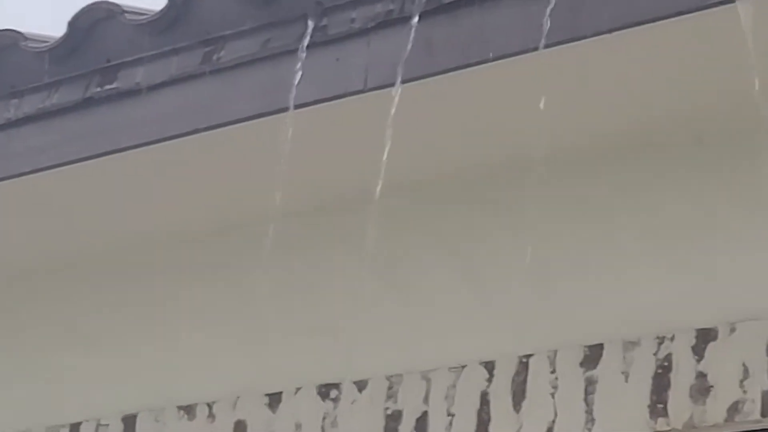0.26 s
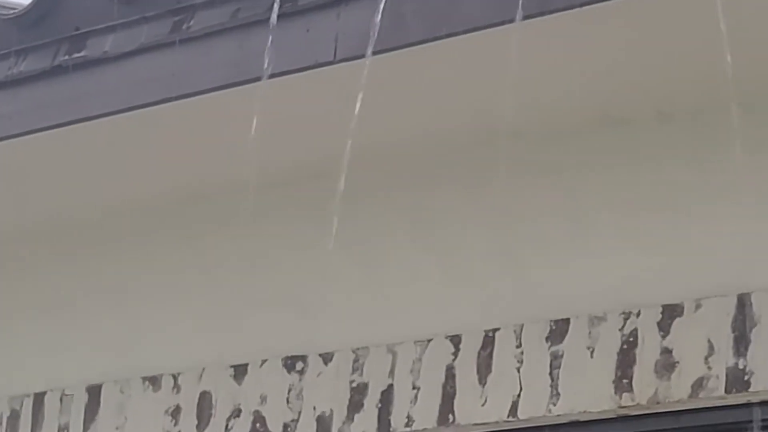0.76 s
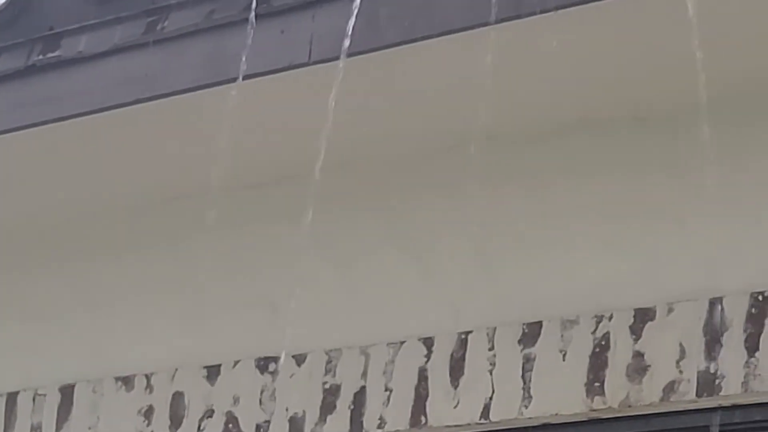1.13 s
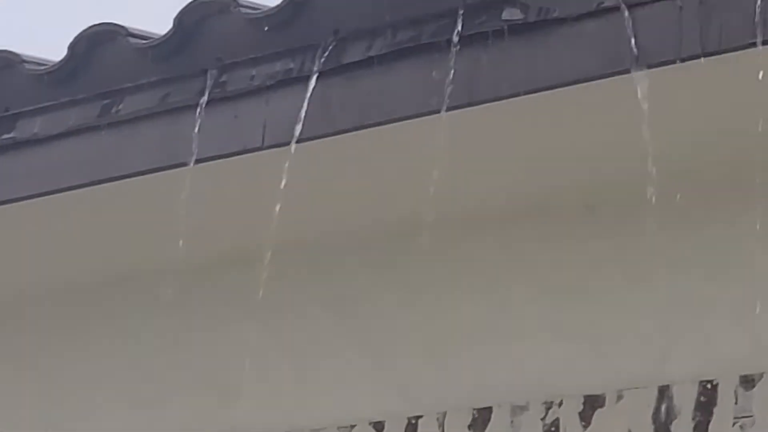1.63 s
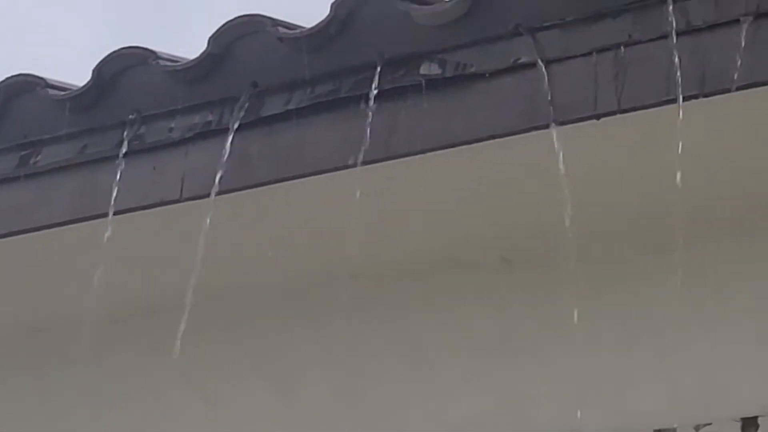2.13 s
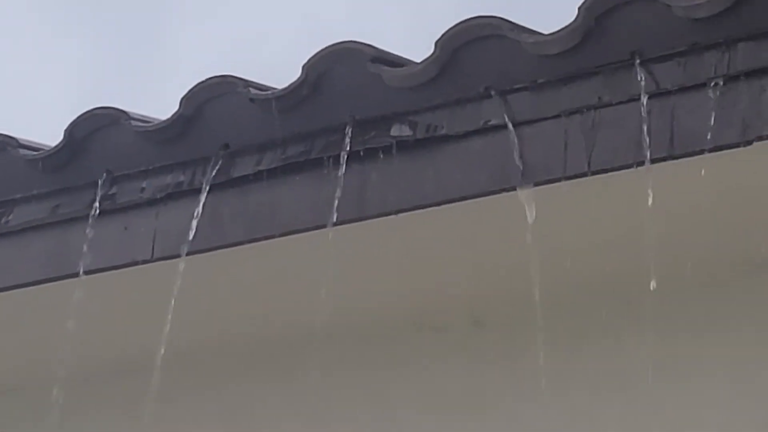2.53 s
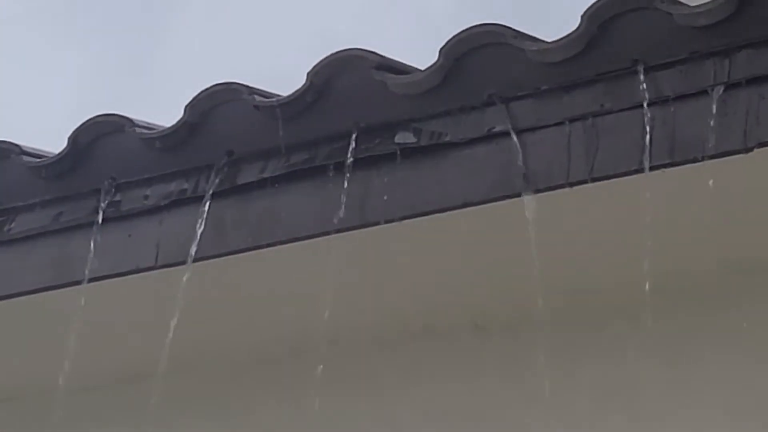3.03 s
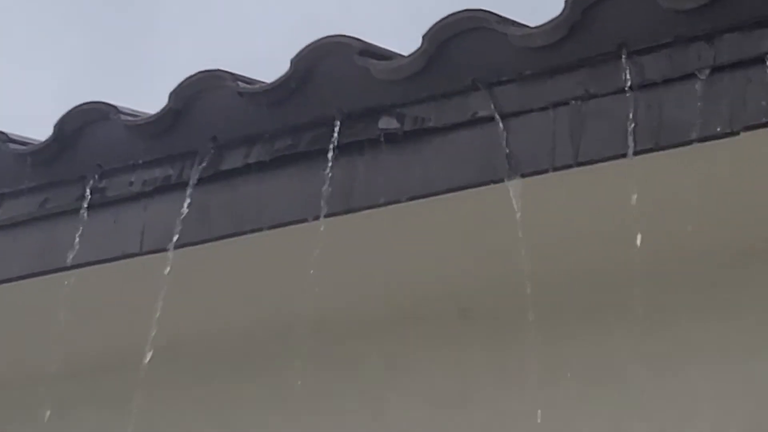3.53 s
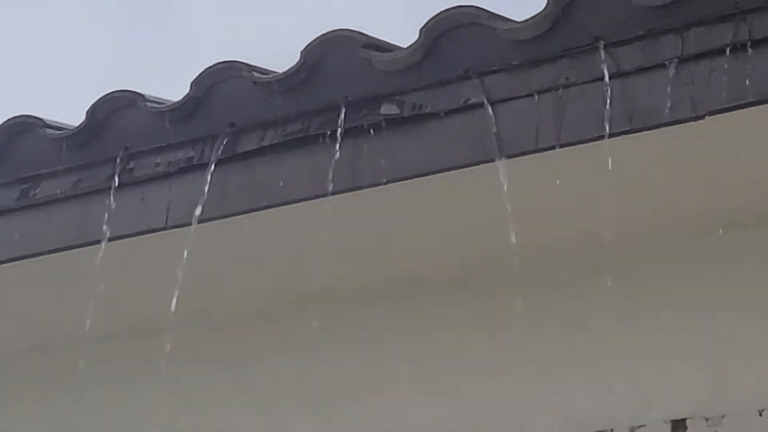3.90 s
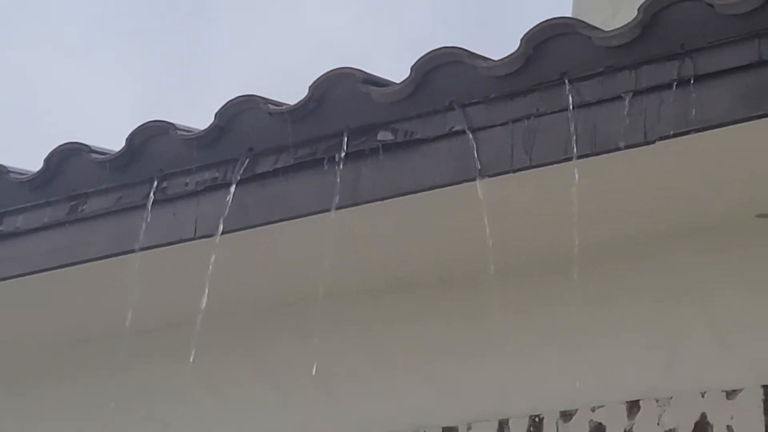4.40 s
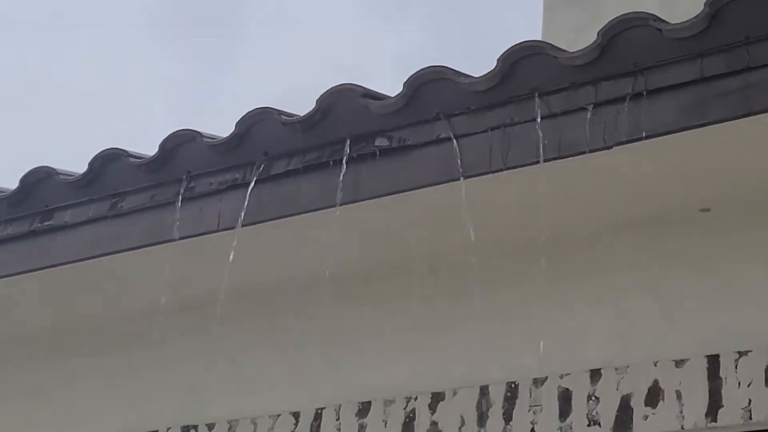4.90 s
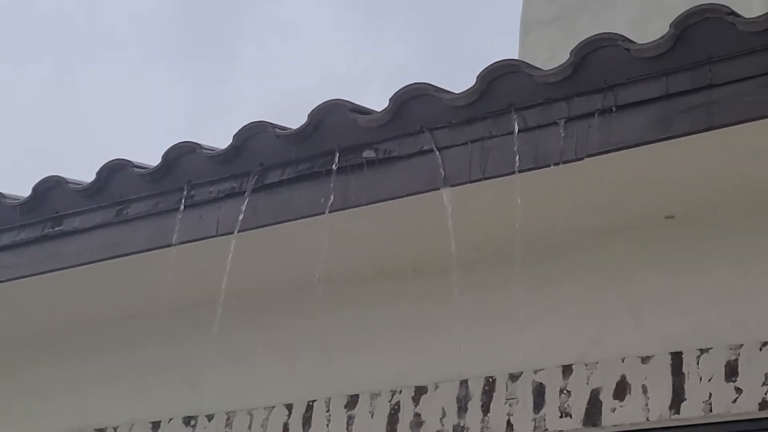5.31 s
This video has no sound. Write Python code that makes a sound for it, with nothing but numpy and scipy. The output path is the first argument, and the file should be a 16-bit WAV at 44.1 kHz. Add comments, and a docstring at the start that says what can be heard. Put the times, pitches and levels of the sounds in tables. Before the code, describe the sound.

Steady rain runs off a tile roof in thin streams, splattering crisply and continuously on wet paving beside a house.

```python
"""Steady rain beside a house: streams pour off a tile roof and splat on wet paving throughout.
Each splat is a short rising plop plus a noise burst, thrown back by walls 4-27 ms later and by a diffuse yard.
Filtered noise makes the far rain and town rumble; a wavering sine hums. Decaying sines ping on the downpipe
near 0.1, 0.7, 1.1, 2.6 and 4.6 s; low sine thuds fall from 0.13 to 4.6 s.
The patter's spray swings right, then left by 0.9 s, and right again after 4.3 s as the treble colour shifts."""
import sys
import numpy as np
from scipy import signal
from scipy.fft import rfft, irfft, next_fast_len
from scipy.io import wavfile
from scipy.ndimage import uniform_filter1d, map_coordinates

SR = 44100
rng = np.random.default_rng(int(sys.argv[2]) if len(sys.argv) > 2 else 0)


def materialize(psi):
    """Save the field psi as 16-bit PCM at rate SR to the path in sys.argv[1].

    A 1-D psi becomes a single channel; in a 2-D psi each row is a channel.
    """
    bounded = np.clip(np.atleast_2d(psi).T, -1, 1)
    quanta = np.round(bounded * 32767).astype(np.int16)
    wavfile.write(sys.argv[1], SR, quanta)


N = 244744

# how hard the streams run: (time [s], plop level [dB], spray level [dB])
FLOW = [(0.0, -20.5, -21), (0.17, -22, -28.5), (0.34, -22, -21), (0.97, -21.5, -25), (1.07, -18.5, -31),
        (1.28, -20, -26.5), (1.39, -28, -20), (1.41, -18.5, -21), (1.61, -22, -22.5), (1.82, -23, -32.5),
        (1.84, -21, -30.5), (2.27, -22, -19.5), (2.47, -20.5, -22.5), (2.49, -22.5, -22.5),
        (2.98, -18.5, -23), (3.06, -23, -27), (3.14, -24, -23), (3.71, -21, -23), (4.39, -22, -28),
        (4.44, -27.5, -20), (4.48, -21.5, -24), (5.43, -25, -21.5), (5.52, -20.5, -24), (5.55, -25, -26)]
# spray drifts across, port colour shifts: (time [s], left over right [dB], share of shifted colour [0-1])
TURN = [(0, 3, 0), (.4, -2, 0.06), (.9, 3, 0), (4.3, 3.5, 0.2), (4.9, -2, 0.45), (5.55, -5.5, 0.6)]


def amp(db):
    """dB to gain."""
    return 10 ** (np.asarray(db) / 20)


def unit(x):
    """Scale to rms 1."""
    return x / np.sqrt(np.mean(x ** 2) + 1e-20)


def along(points, hz, axis=1):
    """One column of (Hz, value, ..) points, read on a log frequency axis."""
    p = np.array(points, float)
    return np.interp(np.log(hz + 1), np.log(p[:, 0] + 1), p[:, axis])


def curves(rows):
    """One value per sample for each column after the time."""
    time_s, *columns = np.transpose(rows)
    return [np.interp(np.arange(N) / SR, time_s, column) for column in columns]


def wobble(rate_hz):
    """A smooth random curve with rate_hz knots a second."""
    knots = rng.standard_normal(N // 100)
    return map_coordinates(knots, [np.arange(N) * rate_hz / SR])


def filtered(x, response):
    """x times a response of frequency."""
    m = next_fast_len(N + 8192)
    return irfft(rfft(x, m) * response(np.fft.rfftfreq(m, 1 / SR)), m)[..., :N]


def rush(spectrum, patchy_db):
    """Stereo noise of rms 1 with time-frequency patches of random gain; likeness sets the mid/side split."""
    # left-right likeness: (frequency [Hz], correlation [0-1])
    likeness = [(60, 0.95), (130, 1), (290, 0.92), (640, 0.68), (1410, 0.3), (3100, 0.13), (6820, 0.27),
                (15000, 0.19)]
    z = signal.stft(rng.standard_normal((2, N)), nperseg=256)[2]
    field = uniform_filter1d(rng.standard_normal(z.shape[1:]), size=5, axis=0)
    field = uniform_filter1d(field, size=8, axis=1)
    pair = signal.istft(z * amp(patchy_db * unit(field)), nperseg=256)[1][:, :N]

    def response(hz):
        angle = np.arccos(np.clip(along(likeness, hz), -1, 1)) / 2
        return amp(along(spectrum, hz)) * [np.cos(angle), np.sin(angle)]

    mid, side = filtered(pair, response)
    return unit(np.array([mid + side, mid - side]))


def lay(start_s, shapes):
    """Sum rows of samples into one track, each from its start time."""
    at = np.round(start_s * SR).astype(int)[:, None] + np.arange(shapes.shape[1])
    return np.bincount(np.clip(at, 0, N).ravel(), shapes.ravel(), N + 1)[:N]


def swell(t, rise_s):
    """An envelope that peaks at 1 after rise_s, then decays smoothly."""
    u = t / rise_s
    return (u * np.exp(1 - u)) ** 2


def town():
    """Low rumble, nearly the same at both ports, with a hum unsteady in level and pitch."""
    # rumble spectrum: (frequency [Hz], relative density [dB])
    rumble_spectrum = [(14, -38), (24, -6), (80, 0.5), (94, -6), (123, -10.5), (195, -8.5), (316, -14.5),
                       (435, -13), (537, -17.5), (665, -17), (822, -14), (900, -18), (1170, -53),
                       (1980, -120)]
    # how the hum wavers: (time [s], level [dB])
    hum_level = [(0.0, -55), (0.12, -39), (0.29, -58), (0.48, -39), (1.11, -48), (2.83, -43), (3.01, -58),
                 (3.06, -37), (3.21, -54), (3.29, -40), (4.39, -54.5), (4.44, -37), (4.51, -56),
                 (4.56, -39), (5.47, -44.5), (5.55, -56)]
    hum_hz, drift_hz, flutter_db = 85, 3.19, 2
    rumble_db, rumble_swell_db = -38.5, 1.24
    hum_db = curves(hum_level)[0] + flutter_db * wobble(10)
    cycles = np.cumsum(hum_hz + drift_hz * wobble(8.7)) / SR
    hum = np.sqrt(2) * amp(hum_db) * np.sin(2 * np.pi * cycles)
    rumble = amp(rumble_db + rumble_swell_db * wobble(6)) * rush(rumble_spectrum, patchy_db=1.5)
    return rumble + hum * amp([[-.6], [.6]])


def rain():
    """Countless far drops merge into a hiss that swells a little with the flow."""
    # hiss spectrum: (frequency [Hz], relative density [dB])
    hiss_spectrum = [(500, -56), (800, -13), (1100, -10.5), (1400, -2), (1700, 0.5), (2000, -3), (2400, -4),
                     (2900, 7), (3500, -2.5), (6000, 0.5), (16000, -6)]
    plop_db = curves(FLOW)[0]
    level_db = -23.0 + 0.8 * (plop_db - plop_db.mean())
    return amp(level_db) * rush(hiss_spectrum, patchy_db=1.0)


def pings():
    """Drops strike the downpipe, which rings faintly on one decaying note."""
    # strikes: (time [s], level before the 0.8 ms onset [dB])
    strikes = [(.08, -43), (.135, -44), (.745, -44), (1.128, -42), (1.16, -44), (2.53, -40), (2.565, -43),
               (2.6, -42), (2.626, -42), (4.62, -43)]
    # pipe note: (pitch [Hz], t60 [s])
    pipe = (840, .16)
    s, db = np.transpose(strikes)[:, :, None]
    hz, t60_s = pipe
    t = np.arange(SR // 4) / SR
    envelope = amp(db - 60 * t / t60_s) * (1 - np.exp(-t / 0.0008))
    return lay(s[:, 0], envelope * np.sin(2 * np.pi * hz * t))


def thuds():
    """Heavy lumps of water hit the ground: each is a soft low push of a few cycles."""
    # lumps: (start time [s], envelope peak [dB], pitch [Hz])
    lumps = [(0.133, -39, 203), (0.549, -33, 181), (1.719, -33, 258), (1.992, -36, 194), (2.233, -35, 213),
             (2.352, -33, 253), (3.207, -29, 198), (3.27, -35, 243), (3.983, -43, 135), (4.263, -32, 241),
             (4.626, -42, 179.2)]
    s, db, hz = np.transpose(lumps)[:, :, None]
    t = np.arange(2000) / SR
    return lay(s[:, 0], amp(db) * swell(t, 1.47 / hz) * np.sin(2 * np.pi * hz * t))


def splats(rows, cycles, glide, spray_s, lag_s):
    """Plops (shrinking air pockets) and spray (noise bursts), direct and off each wall, spread in time."""
    # reflectors: (delay [s], random spread [s], level [dB], lag of left behind right [s])
    walls = [(.0039, .0003, -4, .00003), (.0053, .0004, -8, -.00007), (.016, .001, -13, .0001),
             (.021, .001, -13, -.0001), (.027, .001, -15, .0001)]
    # thin water radiates no bass, the paving lifts two bands: (frequency [Hz], gain [dB])
    puddle = [(300, -49), (700, -8.5), (1000, -8), (1400, 0), (1700, -4), (2000, 1), (2400, -1),
              (2900, 1.6), (3500, -1), (16000, 2)]
    # spray colour: (frequency [Hz], gain [dB])
    spray_colour = [(1000, -28.5), (3000, -22), (5000, -14), (7000, -9), (16000, -9)]
    s, plop_db, hz, spray_db, pan_db = np.transpose(rows)
    t = np.arange(150) / SR
    chance = rng.standard_normal((len(s), 5 + len(walls)))

    rise_s = (cycles * np.exp(.25 * chance[:, 0]) / hz)[:, None]
    # the air pocket shrinks: pitch climbs, passing hz at the envelope peak
    turns = hz[:, None] * (t + glide * (t * t / (2 * rise_s) - t)) + chance[:, 1:2]
    plop = amp(plop_db)[:, None] * swell(t, rise_s) * np.sin(2 * np.pi * turns)

    burst_s = spray_s * np.exp(.4 * chance[:, 2:3])
    fizz = rng.standard_normal(plop.shape)
    # finer droplets fizz higher: each burst has its own tilt
    bright = np.tanh(0.6 * chance[:, -1])[:, None]
    fizz = (fizz - bright * np.roll(fizz, 1, axis=1)) / np.sqrt(1 + bright ** 2)
    spray = amp(spray_db)[:, None] * swell(t, burst_s) * fizz

    plops, sprays = np.zeros((2, 2, N))
    paths = [(0, 0, 0, 0), *walls]  # direct path first; only it is panned
    for k, (delay_s, spread_s, db, wall_lag_s) in enumerate(paths):
        for port, side in enumerate((.5, -.5)):
            lag = side * (wall_lag_s + lag_s * chance[:, 3])
            arrive_s = s + delay_s + spread_s * chance[:, 3 + k] + lag
            gain = amp(db + side * pan_db * (k == 0))[:, None]
            # envelope peaks land on the arrival time
            plops[port] += lay(arrive_s - rise_s[:, 0], gain * plop)
            sprays[port] += lay(arrive_s - burst_s[:, 0], gain * spray)
    plops = filtered(plops, lambda f: amp(along(puddle, f)))
    sprays = filtered(sprays, lambda f: amp(along(spray_colour, f)))
    return plops, sprays


def small_splats(count):
    """A random table of small splats: some middling ones among a crowd of tiny ones."""
    even, normal = rng.random((count, 3)), rng.standard_normal((count, 2))
    time_s = even[:, 0] * N / SR
    size_db = 8 * np.tanh(-.5 * np.log(1 - even[:, 1]))
    spray_db = 0.35 * size_db + np.minimum(-3.2 * np.log(1 - even[:, 2]), 9)
    hz = np.clip(3300 * np.exp(.42 * normal[:, 0]), 1150, 9000)
    # deep plops last longer, so at equal energy their peaks are lower
    plop_db = size_db + 4 * np.log2(hz / 3000)
    pan_db = 4 * normal[:, 1]
    return np.transpose([time_s, plop_db, hz, spray_db, pan_db])


def streams():
    """Roof streams break into drops: loud splats over a patter that follows the flow."""
    # loudest splats, levels before colouring:
    # (time [s], plop peak [dB], plop pitch [Hz], spray envelope peak [dB], left over right [dB])
    loud_splats = [(0.0285, -9, 1640, -10, 5), (0.0495, 0, 3770, -7, -1), (0.0895, -9, 4060, -4, -2),
                   (0.1339, -1.5, 2330, -18, 5), (0.2696, -5, 2370, -3, -6), (0.294, -3.5, 2080, -10, -3),
                   (0.3215, -20, 4840, -4, -1), (0.3443, -22, 2540, -1, -7), (0.3774, -4, 2650, 1, 3),
                   (0.5456, -18, 2260, 3.5, 1), (0.6438, 3.5, 4200, -11, -6), (0.8613, -3, 3040, -13, -1),
                   (0.8891, -12, 4410, -11, -1), (1.0363, -7, 2330, -13, -2), (1.0502, -3, 2200, -5, 4),
                   (1.0783, -5, 3300, 2, 1), (1.1409, -3, 4030, -1, 0), (1.1728, -21, 3750, 6.5, 1),
                   (1.2352, -14, 4180, -18, -7), (1.2638, -12, 2020, -14, 10), (1.3183, -23, 3510, -10, 2),
                   (1.4056, -8, 2280, 2.5, 0), (1.4685, -4, 2030, -11, 1), (1.5293, -5, 1800, -28, 2),
                   (1.5568, -13, 5660, 2, -5), (1.7001, -6.5, 1680, -16, 4), (1.8393, 1, 4900, -16, 2),
                   (1.8799, -4, 2050, -13, -3), (1.9353, -1, 5200, -9, -1), (1.9615, -9, 2470, -11, 3),
                   (2.0403, -24, 2150, -6, -7), (2.0476, -17, 5800, 1, -15), (2.0774, -2.5, 2070, 0, 3),
                   (2.124, -1.5, 2380, -2, 5), (2.1401, 0, 4930, -10, -3), (2.3158, -4, 5280, 2, -6),
                   (2.3359, -21, 3100, -4, 1), (2.3665, -4, 3880, 3, -4), (2.4523, 8, 5950, -9, 4),
                   (2.5612, -21, 2930, -4, -1), (2.5813, -8, 1430, -17, 1), (2.6315, -2.5, 1700, -15, 3),
                   (2.6593, -11, 1720, -5, -2), (2.7589, -2, 2380, -13, 3), (2.7782, 2, 5230, -10, -13),
                   (2.8259, -17, 4760, 0, -3), (2.8901, -2.5, 2370, -9, 0), (2.925, -4, 2730, -15, 6),
                   (2.9429, -6, 2660, 5, -6), (2.9498, -7, 1740, -7, 6), (2.9635, -4.5, 1530, -7, -12),
                   (2.9788, -2, 4720, -7, -6), (3.1852, -18, 3080, -3, 2), (3.2068, -16, 4890, 0, 2),
                   (3.3505, -8.5, 1220, -15, 5), (3.3765, -4.5, 2690, -7, -7), (3.4217, -9, 2200, -10, 3),
                   (3.5446, -22, 5990, -9, 3), (3.5545, -17, 4130, 0, 5), (3.6187, -5, 3220, -5, 2),
                   (3.6431, -3.5, 2350, -14, 3), (3.6944, -11, 5810, -3, 3), (3.7754, 4.5, 3620, 1, -5),
                   (3.827, -5, 1900, -7, 5), (3.9314, -7, 1860, -5, 5), (3.9497, -4, 2220, -11, -6),
                   (4.0663, -9, 2290, 3, 4), (4.0798, -9, 4010, 0, 0), (4.1047, -9, 2450, 2, 4),
                   (4.2084, -9, 2410, -16, 5), (4.623, -7.5, 1780, -7, 3), (4.6414, -11, 1870, -8, 7),
                   (4.7337, -2, 5460, -15, -3), (4.9614, -12, 4630, -1, 0), (5.0664, -8, 1350, -8, 2),
                   (5.2515, -10, 1640, -9, 0), (5.3032, -9, 4760, 0, 9), (5.3767, -15, 4310, 4, -8),
                   (5.4001, -19, 4410, -3, -15), (5.4317, -4, 2970, -3, -3)]
    clump_db, surge_db = 0.4, 1.67  # fast clumps of drops; slower surges
    plop_db, spray_db = curves(FLOW)
    plops, sprays = splats(small_splats(count=2300), cycles=1.15, glide=0.27, spray_s=.00035, lag_s=.00011)
    clumps = amp(clump_db * wobble(40) + surge_db * wobble(9))
    drift = amp(curves(TURN)[0] * [[.5], [-.5]])
    patter = amp(plop_db) * unit(clumps * plops)
    patter = patter + amp(spray_db) * unit(clumps * sprays) * drift
    plops, sprays = splats(loud_splats, cycles=.8, glide=.35, spray_s=.00042, lag_s=.00004)
    return patter + plops + sprays


def yard(x, alike):
    """Diffuse answer of the yard, partly shared by the ports; each frequency dies at its own speed."""
    # decay: (frequency [Hz], t60 [s])
    decay = [(300, 0.32), (2000, 0.51), (8000, 0.22), (16000, 0.044)]
    a, b = rng.standard_normal((2, SR // 3))
    angle = np.arccos(np.clip(alike, 0, 1)) / 2
    pair = np.cos(angle) * a + np.sin(angle) * b * [[1], [-1]]
    hz, t, z = signal.stft(pair, SR, nperseg=256)
    fade = amp(-60 * t / along(decay, hz)[:, None])
    tail = signal.istft(z * fade, SR, nperseg=256)[1]
    return signal.fftconvolve(x, tail / np.linalg.norm(tail[0]), axes=1)[:, :N]


def scene():
    """Streams, thuds and pipe with their yard answer, plus rain and town."""
    water = streams() + thuds() + pings()
    return water + amp(-6.5) * yard(water, alike=0.19) + rain() + town()


def record(dry):
    """Colour each port's treble, squeeze peaks below full scale and cut above the band limit."""
    # port colour: (frequency [Hz], left gain [dB], right gain [dB])
    port_colour = [(1000, -0.5, 0), (2930, -0.5, -2), (4140, -0.2, 2), (4780, 1.5, 1), (5950, 1.5, 2),
                   (6320, -0.5, -12), (7740, -0.5, -1), (8150, -0.5, -0.5), (9440, -3, 8), (11100, -3.5, 2),
                   (11600, -1.5, 5), (13100, 2.5, -0.5), (14400, 2, -2), (15600, 3.5, -16.7)]
    top_hz, ceiling = 15800, .92

    def colour(hz):
        return amp([along(port_colour, hz, axis=1), along(port_colour, hz, axis=2)])

    def shifted_colour(hz):
        # dips and peaks around 10.5 kHz sit up to 1300 Hz higher
        return colour(hz - 1300 * np.exp(-((hz - 10500) / 3200) ** 2))

    ahead, aside = filtered(dry, colour), filtered(dry, shifted_colour)
    turned = np.clip(curves(TURN)[1], 0, 1)
    ports = (1 - turned) * ahead + turned * aside
    ports = filtered(ports, lambda hz: hz < top_hz)
    held = ports / (1 + np.abs(ports / ceiling) ** 5) ** (1 / 5)
    return filtered(held, lambda hz: hz < top_hz)


dry = scene()
out = record(dry)
materialize(out)
```